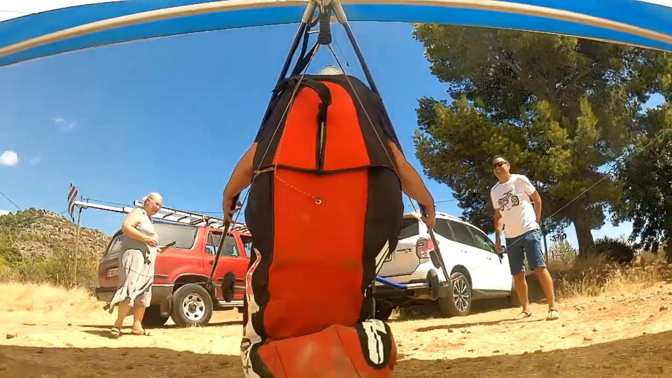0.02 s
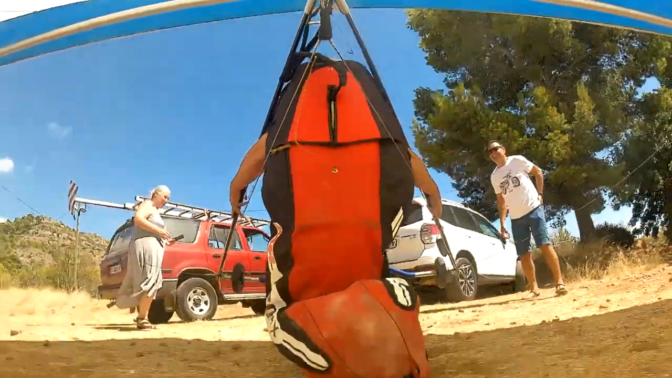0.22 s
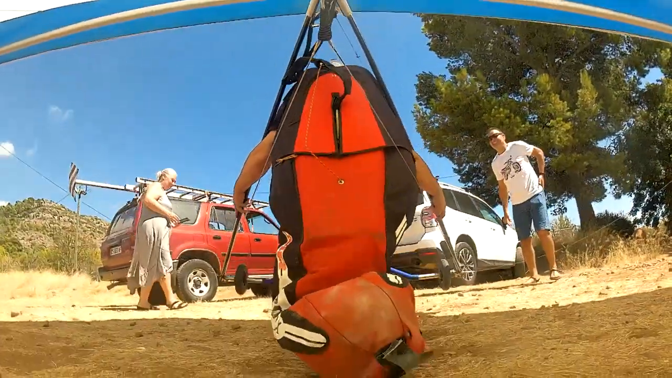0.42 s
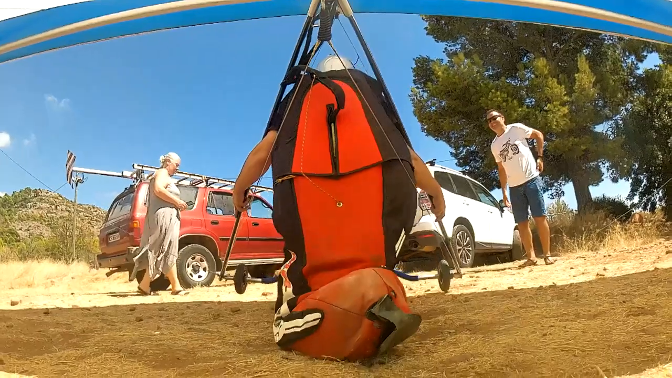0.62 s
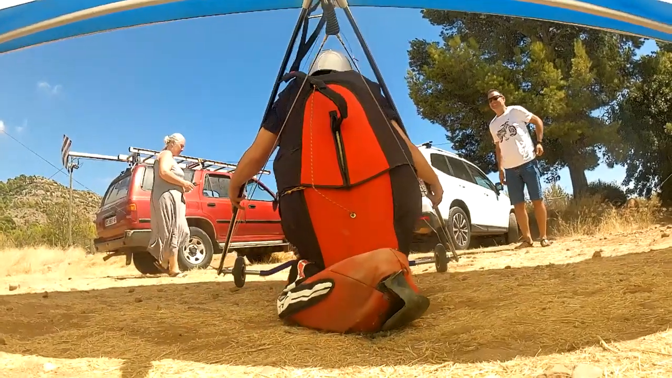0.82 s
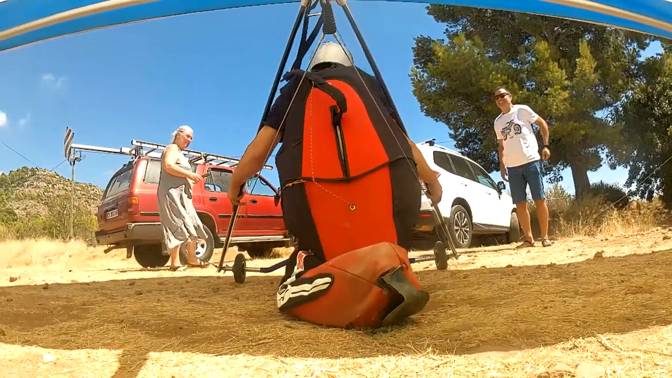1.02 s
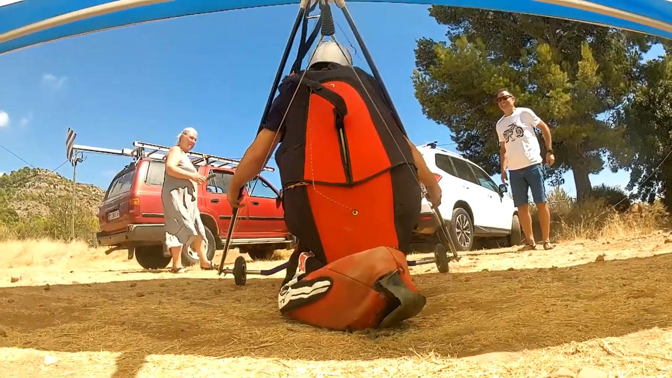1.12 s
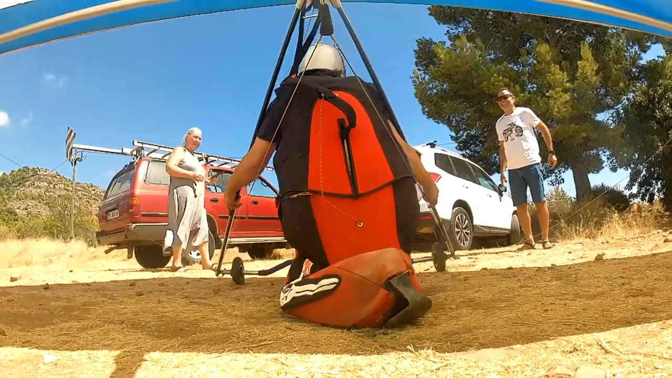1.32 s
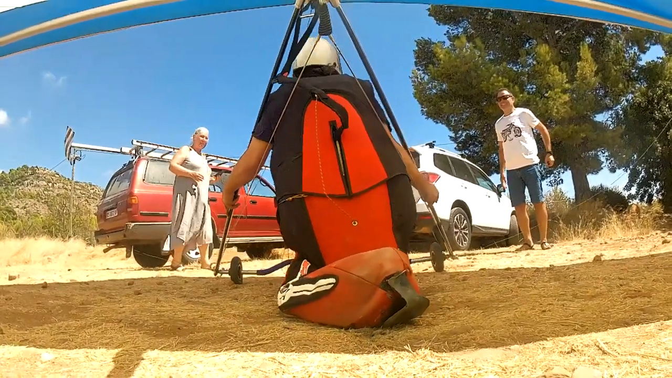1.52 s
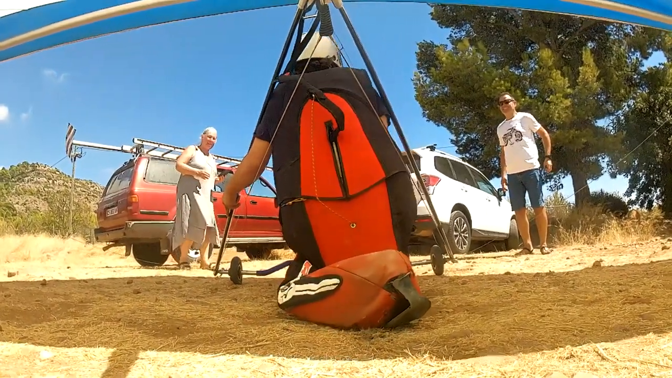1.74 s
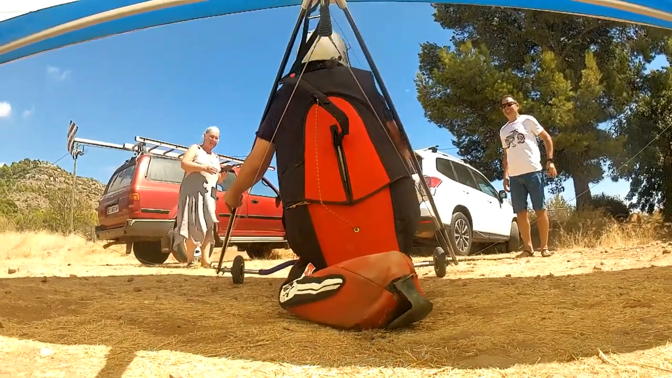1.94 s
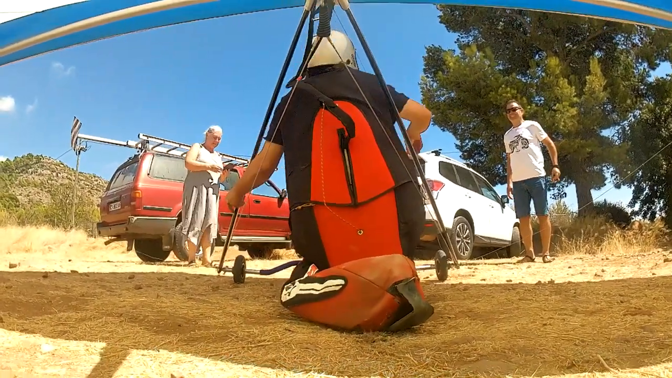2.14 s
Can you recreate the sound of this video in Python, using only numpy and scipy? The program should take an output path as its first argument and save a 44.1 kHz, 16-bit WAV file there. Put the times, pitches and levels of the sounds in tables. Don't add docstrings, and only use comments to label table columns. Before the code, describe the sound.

Glider wheels rattle over dirt and stones, heard through the metal frame. Faint clicks lead to a heavy, clipped blow at 0.2 s with a low thump and quick rebound, then a skid and gritty ticks. Rattling swells into a second, longer distorted blow at 0.65-0.8 s. Sharp hollow knocks follow near 0.9, 1.07, 1.41 and 1.45 s, thinning to small clicks and short scrapes after 1.9 s, over low boom hum and faint hiss.

```python
import sys
import numpy as np
from scipy import signal
from scipy.fft import rfft, irfft, next_fast_len
from scipy.io import wavfile
from scipy.ndimage import map_coordinates

SR = 44100
rng = np.random.default_rng(int(sys.argv[2]) if len(sys.argv) > 2 else 0)


def convert_level_to_amplitude(level_db):
    exponent = np.asarray(level_db, float) / 20
    return 10 ** exponent


def persist_wave(psi):
    counts = np.round(np.clip(psi, -1, 1) * 32767).astype(np.int16)
    wavfile.write(sys.argv[1], SR, np.atleast_2d(counts).T)


N = 97020

# pitch_hz, density_db (per Hz)
HISS_SPECTRUM = [(1470, -8), (2500, -5), (4030, 3.5), (6920, -5), (15800, -9)]
# time_s, peak_db, length_s
SPUTTER_BURSTS = [(0.2196, -25.5, .002), (0.2263, -29.5, .002), (0.228, -17.5, .002), (0.24, -7, .0015),
                  (0.246, -20, .002), (0.255, -14, .002), (0.258, -17.5, .0015), (0.263, -30, .0015),
                  (.272, -19.5, .001), (0.678, -34.5, .0015), (.685, -30, .0015), (0.699, -29.5, .0015),
                  (0.7114, -26.5, .0015), (0.687, -32, .0015), (0.723, -35.5, .002), (0.742, -32.5, .002),
                  (0.755, -30.5, .002), (0.7604, -23, .0015), (0.763, -29.5, .002)]
# time_s, level_db
SWAY_LEVEL = [(0, -59), (.2, -47), (.25, -13), (.33, -30.5), (0.469, -43), (0.701, -35.5), (.78, -18),
              (.95, -45.5), (1.08, -37.5), (1.17, -50), (1.241, -32), (1.522, -35.5), (1.701, -48.5),
              (1.879, -36), (2.2, -40.5)]
# time_s, peak_db
GRIT_TICKS = [(0.28, -28), (0.293, -28.5), (0.296, -14.5), (0.3125, -27.5), (0.329, -28), (0.332, -24.5),
              (0.3429, -33), (0.355, -24), (0.3691, -24.5), (0.3718, -19), (0.3802, -34), (0.3911, -34.5),
              (0.4064, -33), (0.432, -39.5), (0.4095, -25), (0.638, -25.5), (0.6544, -42), (0.671, -35.5),
              (0.779, -31), (0.7903, -30), (0.8106, -36), (0.8298, -34), (0.835, -36), (0.856, -22),
              (0.9062, -23), (1.07, -24), (1.267, -34), (1.8245, -40.5), (2.012, -36), (2.127, -36),
              (2.1974, -35)]
# pitch_hz, width_hz, level_db
FRAME_TUBES = [(755, 105.4, -3.5), (887, 86, -3), (1041.7, 32, 4), (1404.6, 90, -3), (1618, 66, -5),
               (1838, 67, -9.5), (2220, 72, -13.5)]
# pitch_hz, width_hz, level_db
KEEL_MODES = [(97, 120, -9), (144.5, 33.3, 0), (196, 34.4, 1.5), (290.5, 71.4, 1.5), (407, 71, -1.5),
              (566, 38, -6), (670, 47, -17)]
# pitch_hz, width_hz, level_db
THIN_TUBES = [(2470, 680, 5), (3485, 250, 1.5), (3726, 377, 4), (4970, 540, -9)]
# pitch_hz, width_hz, level_db
DRAGGED_FRAME = [(786, 61, 3), (1050, 51, 1), (1380, 74, 1.5), (1613, 100, -2.5), (1790, 280, -7.5),
                 (2166, 280, -12.5)]
# time_s, peak_db, pitch_hz, t60_s
PART_KNOCKS = [(0.3676, -4, 256, 0.013), (0.403, -14, 190, 0.058), (0.422, -18, 1404, .02),
               (.511, -24.5, 1050, .03), (.636, -5, 1040, 0.033), (0.908, -3.5, 993, 0.028),
               (1.07, -6.5, 1061, 0.039), (1.173, -13.5, 1627, 0.024), (1.204, -22, 1425, 0.032),
               (1.249, -26.5, 2730, 0.015), (1.125, -19, 1050, 0.063), (1.451, -38, 4990, 0.02),
               (1.25, -18.5, 155, 0.16), (1.335, -17, 1050, 0.02), (1.383, -27, 1000, .03),
               (1.407, -20, 1580, 0.048), (1.449, -8.5, 1380, 0.029), (1.492, -21, 1453, 0.036),
               (1.493, -43.5, 4020, 0.056), (1.625, -31.5, 1076, 0.035), (1.736, -31, 1073, .06),
               (1.761, -23, 324, 0.083), (1.771, -32, 1047, 0.074), (1.826, -26, 1050, 0.03),
               (1.905, -27, 1444, 0.025), (2.084, -14.5, 1420, 0.027), (2.159, -25, 1050, 0.021)]
# start_s, rise_s, hold_s, fall_s, drive_db
BLOW_STAGES = [
    (0.214, 0.0062, 0.027, 0.0042, 5),
    (0.249, 0.0019, 0.0084, 0.021, 1.5),
    (0.675, 0.0036, 0.016, .008, -9.5),
    (0.7, 0.004, 0.032, 0.0036, -10),
    (0.743, 0.0075, 0.017, 0.0063, -2.5),
]
# keel_over_frame_db, loudest_tube_hz
BLOW_VOICES = [(-9, 1050), (-8, 1350), (-9, 1080), (-12, 1040), (-4, 1100)]
# time_s, peak_db, keel_over_db, thin_over_db, length_s
EARLY_STONES = [(0.032, -23, -23, -42, 0.012), (0.071, -18.5, -4, -23.5, 0.0032),
                (0.131, -26, -12, -22.5, 0.0025), (0.197, -13.5, -32, -22, 0.004),
                (0.206, -3.5, 0, -18, 0.0094), (0.318, -32, -6, 1, 0.0045),
                (0.344, -12.5, 4.5, -4, 0.00071), (0.365, -9, 4, -6.5, 0.00078),
                (0.403, -37, 11, 15.5, 0.0013), (0.423, -20.5, -31, -18, 0.0016),
                (0.435, -10.5, -36, -18, 0.0036), (0.51, -42, 25.5, -32, 0.012),
                (0.544, -31, -23, -43, 0.0045), (0.594, -20.5, -10, -25, 0.0016),
                (0.646, -20, -6, -32, 0.0023), (0.814, -11.5, -24, -4, 0.0012),
                (0.909, 1.5, -15, -45, 0.0031), (0.926, -8, -27, -21, 0.0044),
                (0.98, -15.5, -13, -13.5, 0.0026), (1.069, -1, -11, -23, 0.0087),
                (1.12, -16.5, -14, -22, 0.0021), (1.17, -8.5, -8, -20, 0.0017),
                (1.204, -12.5, -30, -24, 0.012)]
# time_s, peak_db, keel_over_db, thin_over_db, length_s
LATE_STONES = [(1.253, -9, -2.5, -21.5, 0.0029), (1.286, -36, 10, -10, 0.0057),
               (1.311, -15, -3, -21, 0.0075), (1.334, -20, -10.5, -42, 0.0014),
               (1.409, 1.5, -9.5, -23.5, 0.0014), (1.448, -2.5, -12.5, -18, 0.004),
               (1.493, -12.5, -14, -22, 0.005), (1.56, -23, -26, -34, 0.0088),
               (1.573, -19, -16.5, -50, 0.0018), (1.606, -23.5, -25, -19.5, 0.0017),
               (1.625, -20.5, -34.5, -25, 0.0021), (1.729, -31.5, 6, -23, 0.0023),
               (1.765, -19, 0.5, -27, 0.009), (1.826, -18.5, -21, -26, 0.0025),
               (1.871, -10, -9.5, -27, 0.0044), (1.925, -12, -8.5, -22, 0.0012),
               (1.944, -12, -24, -24, 0.002), (2.005, -22.5, 5, -25, 0.0025),
               (2.031, -26, -15, -19, 0.0066), (2.061, -24, 9, -17, 0.0035),
               (2.087, -7, -16, -17.5, 0.00055), (2.145, -24, -5, -18, 0.0018),
               (2.183, -12.5, -16.5, -29, 0.0072)]
# time_s, rattle_db, keel_over_rattle_db
ROLL_LEVEL = [(0, -48, 7.5), (.19, -40, 3), (.27, -14.5, -3.5), (.42, -27, 2.5), (0.489, -36, 0),
              (0.618, -12, -3), (.72, -4, -7), (0.791, -11, -3), (0.902, -14.5, -5), (.95, -30.5, 0),
              (1.05, -29, -2.5), (1.129, -26.5, 2.5), (1.33, -36.5, 9), (1.378, -32, 2.5), (1.68, -45, 6),
              (1.85, -38.5, 4), (1.932, -26, 1.5), (2.2, -37.5, 6.5)]
# start_s, rise_s, hold_s, fall_s, level_db
WHEEL_SKIDS = [
    (.278, 0.0077, 0.065, .04, -23.5),
    (1.0, 0.043, 0.02, 0.013, -36),
    (1.085, 0.016, 0.043, 0.0084, -28),
    (1.235, 0.0061, 0.092, 0.021, -31.5),
    (1.9, .005, 0.073, 0.056, -24.5),
    (2.03, 0.0085, 0.01, 0.0089, -29),
    (2.056, 0.0066, .018, 0.0078, -24.5),
    (2.135, .02, 0.014, 0.017, -24),
]


def unit(x):
    return x / np.sqrt(np.mean(x ** 2) + 1e-20)


def wobble(rate):
    return map_coordinates(rng.standard_normal(400), [np.arange(N) * rate / SR])


def filtered(x, response):
    m = next_fast_len(len(x) + SR // 4)
    return irfft(rfft(x, m) * response(np.fft.rfftfreq(m, 1 / SR)), m)[:len(x)]


def rings(push, body):
    top = 0.99 * body[-1][0]

    def response(f):
        total = 0
        for k, (hz, width, db) in enumerate(body):
            mode = 1j * f * width / (hz * hz - f * f + 1j * f * width)
            total = total + (-1) ** k * convert_level_to_amplitude(db) * mode
        return total / (1 + 1.4j * f / top - (f / top) ** 2) ** 2

    return filtered(push, response)


def jolts(rate, spread_db, length_s):
    draw = rng.random((4000, 2))
    at = (np.cumsum(-np.log(draw[:, 0])) / rate * SR).astype(int)
    sizes = convert_level_to_amplitude(-spread_db * np.log(draw[:, 1]))
    kicks = np.bincount(at, sizes, N)[:N]
    decay = np.exp(-np.arange(SR // 50) / SR / length_s)
    return signal.fftconvolve(kicks, decay)[:N] * rng.standard_normal(N)


def place(s, sound, peak_db):
    out, at = np.zeros(N + SR), round(s * SR)
    out[at:at + len(sound)] = sound * convert_level_to_amplitude(peak_db) / np.abs(sound).max()
    return out[:N]


def stretches(rows):
    t, out = np.arange(N) / SR, np.zeros(N)
    for s, rise, hold, fall, db in rows:
        corners = np.cumsum([s, rise, hold, fall])
        out += convert_level_to_amplitude(db) * np.interp(t, corners, [0, 1, 1, 0]) ** 2
    return out


def recorder_hiss():
    f, level = np.transpose(HISS_SPECTRUM)
    colour = lambda hz: convert_level_to_amplitude(np.interp(np.log(hz + 1), np.log(f), level))
    return convert_level_to_amplitude(-71) * unit(filtered(rng.standard_normal(N), colour))


def input_sputter():
    t, swell = np.arange(N) / SR, np.zeros(N)
    for s, db, length_s in SPUTTER_BURSTS:
        swell += convert_level_to_amplitude(db) * np.exp(-((t - s) / length_s) ** 2)
    low_hz, high_hz = 2500, 9000
    colour = lambda f: f ** 2 / (f ** 2 + low_hz ** 2) / np.sqrt(1 + (f / high_hz) ** 2)
    return swell * unit(filtered(rng.standard_normal(N), colour)) / 2


def boom_sway():
    s, level = np.transpose(SWAY_LEVEL)
    colour = lambda hz: hz ** 2 / (hz ** 2 + 28 ** 2) / (1 + (hz / 95) ** 4)
    rumble = unit(filtered(rng.standard_normal(N), colour))
    turns = np.cumsum(56.43 + 6 * wobble(16)) / SR
    level_db = np.interp(np.arange(N) / SR, s, level) + 0.5 + 0.93 * wobble(25)
    return convert_level_to_amplitude(level_db) * (np.sin(2 * np.pi * turns) + convert_level_to_amplitude(-4) * rumble)


def grit_ticks():
    t, out = np.arange(SR // 50) / SR, np.zeros(N)
    tick_hz, width_hz, air_db = 4830, 1500, -20
    rise_s, decay_s = 0.0017, 0.00094

    def colour(f):
        mount = 1j * f * width_hz / (tick_hz ** 2 - f * f + 1j * f * width_hz)
        air = convert_level_to_amplitude(air_db) * (1j * f / (tick_hz + 1j * f)) ** 2
        return (mount + air) / (1 + 1j * f / 9000) ** 2

    shape = np.exp(-t / decay_s) * (1 - np.exp(-(t / rise_s) ** 2))
    for s, db in GRIT_TICKS:
        scratch = rng.standard_normal(len(t)) * shape
        out += place(s, filtered(scratch, colour)[:len(t)], db - 2.5)
    return out


def knocks():
    t, out = np.arange(SR // 8) / SR, np.zeros(N)
    rise = 1 - np.exp(-(t / 0.0005) ** 2)
    for s, db, hz, t60 in PART_KNOCKS:
        out += place(s, -np.sin(2 * np.pi * hz * t) * convert_level_to_amplitude(-60 * t / t60) * rise, db)
    return out


def keel_thump():
    t = np.arange(SR // 5) / SR
    hz, t60_s, rise_s = 173, 0.11, 0.0071
    push = -np.sin(2 * np.pi * hz * t) * convert_level_to_amplitude(-60 * t / t60_s) * (1 - np.exp(-t / rise_s))
    return place(0.212, push, -6.5)


def blows():
    frame = unit(rings(jolts(1200, 2.5, 0.003), FRAME_TUBES))
    keel = unit(rings(jolts(500, 4.4, 0.0058), KEEL_MODES))
    thin = unit(rings(jolts(300, 8.6, 0.0028), THIN_TUBES))
    push, out = rng.standard_normal(N), np.zeros(N)
    width_hz = 26
    for stage, (keel_db, hz) in zip(BLOW_STAGES, BLOW_VOICES):
        tube = unit(filtered(push, lambda f: 1j * f / (hz * hz - f * f + 1j * f * width_hz)))
        ringing = frame + convert_level_to_amplitude(-3) * tube + convert_level_to_amplitude(keel_db) * keel + convert_level_to_amplitude(-23.5) * thin
        out += stretches([stage]) * ringing
    return out


def stones():
    t, out = np.arange(SR // 8) / SR, np.zeros(N)
    rise = 1 - np.exp(-t / 0.00024)
    for s, db, keel_db, thin_db, length_s in EARLY_STONES + LATE_STONES:
        shape = np.exp(-t / max(length_s, 3e-4)) * rise
        # body, damping (times its width), level over the stone's peak in dB
        parts = [(FRAME_TUBES, 2.4, -5.5), (KEEL_MODES, 0.83, keel_db - 4), (THIN_TUBES, 0.83, thin_db)]
        for body, damping, over_db in parts:
            scrape = rng.standard_normal(len(t)) * shape
            struck = [(hz, width * damping, level + 2 * rng.standard_normal())
                      for hz, width, level in body]
            out += place(s, rings(scrape, struck)[:len(t)], db + over_db)
    return out


def rolling():
    s, level, keel_over = np.transpose(ROLL_LEVEL)
    t = np.arange(N) / SR
    level_db, keel_db = np.interp(t, s, level), np.interp(t, s, keel_over)
    roll = convert_level_to_amplitude(level_db - 4.5 + 0.3 * wobble(38))
    skid = stretches(WHEEL_SKIDS)
    rattle = roll * unit(rings(jolts(1300, 1.6, 0.0013), FRAME_TUBES))
    scrape = skid * unit(rings(jolts(1500, 1, 0.001), DRAGGED_FRAME))
    force = roll + convert_level_to_amplitude(0.5) * skid
    thin_level = convert_level_to_amplitude(-23) * force * (force / convert_level_to_amplitude(-20)) ** 0.13
    thin = thin_level * unit(rings(jolts(1400, 1.2, 0.0014), THIN_TUBES))
    lumps = jolts(400, 1.5, 0.0046) * convert_level_to_amplitude(0.51 * wobble(21.04))
    shudder = convert_level_to_amplitude(level_db + keel_db - 4.5) * unit(rings(lumps, KEEL_MODES))
    return rattle + scrape + thin + shudder


def scene():
    background = boom_sway() + grit_ticks()
    impacts = knocks() + keel_thump() + blows() + stones()
    return (background + impacts + rolling())[None]


def top_cut(x):
    return signal.sosfilt(signal.butter(12, 15950, fs=SR, output="sos"), x)


def record(dry):
    x = dry + recorder_hiss()
    clip_at, hardness = 0.72, 30
    x = x / (1 + np.abs(x / clip_at) ** hardness) ** (1 / hardness)
    x = np.clip(x[0] + input_sputter(), -0.8, 0.8)
    mix = filtered(x, lambda hz: hz < 15950)[None] - 0.0038
    return top_cut(mix)


dry = scene()
out = record(dry)
persist_wave(out)
```